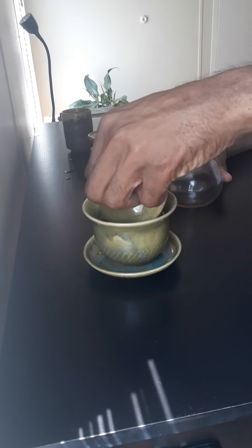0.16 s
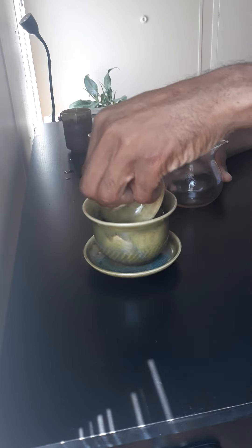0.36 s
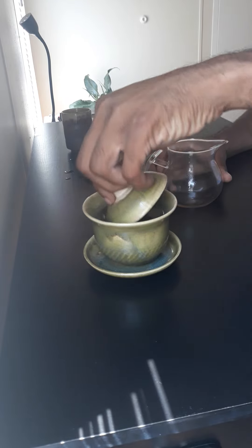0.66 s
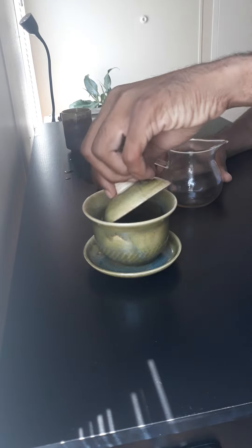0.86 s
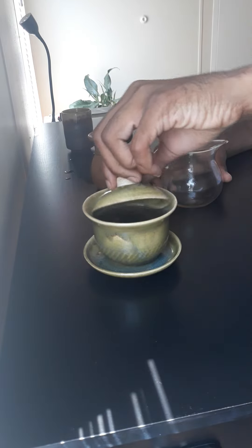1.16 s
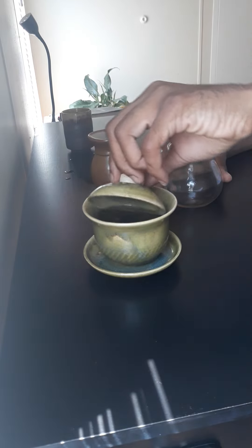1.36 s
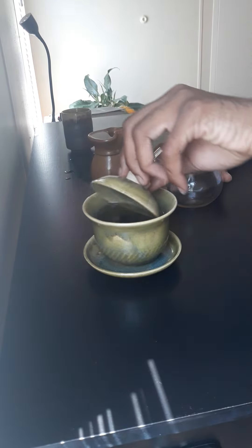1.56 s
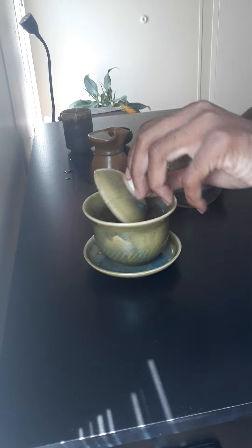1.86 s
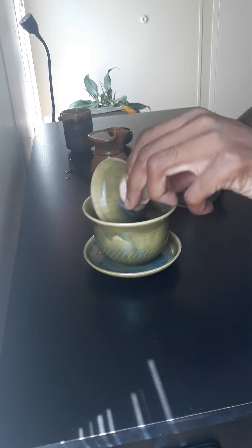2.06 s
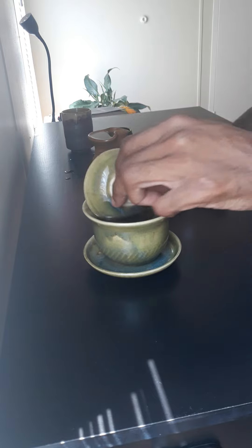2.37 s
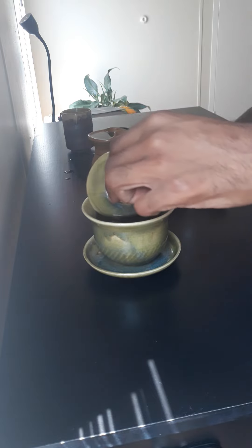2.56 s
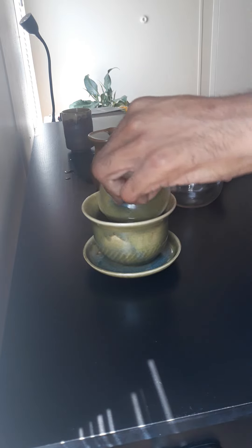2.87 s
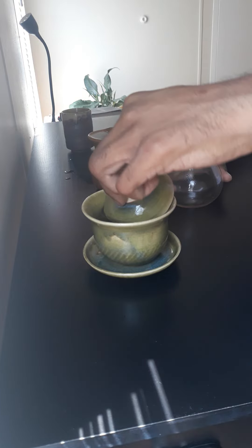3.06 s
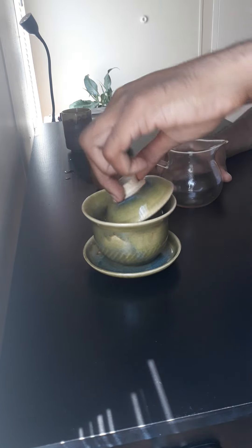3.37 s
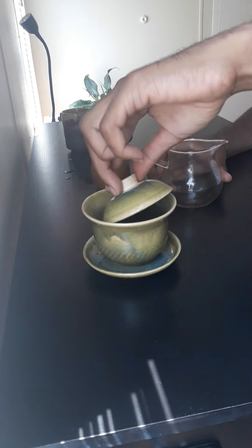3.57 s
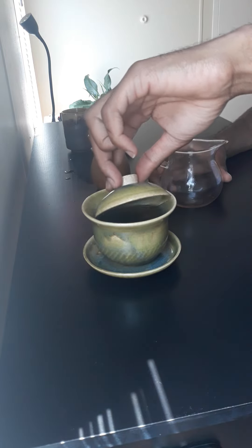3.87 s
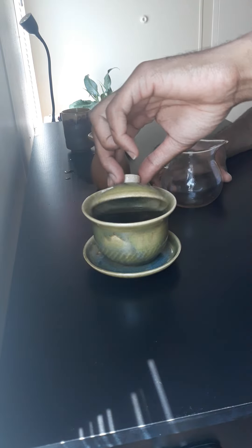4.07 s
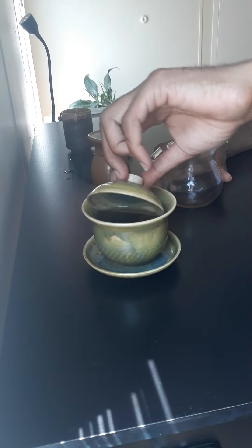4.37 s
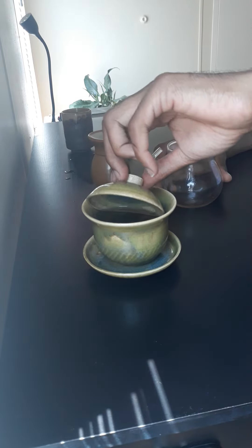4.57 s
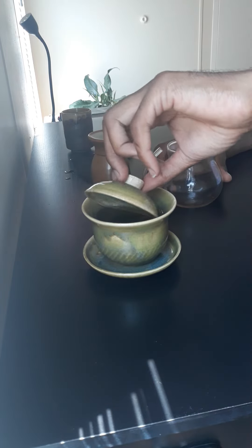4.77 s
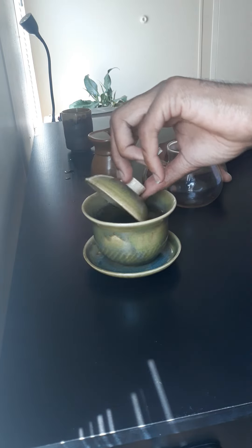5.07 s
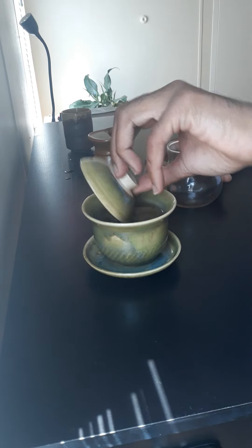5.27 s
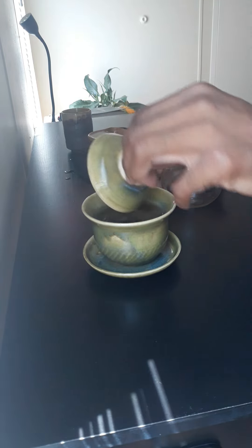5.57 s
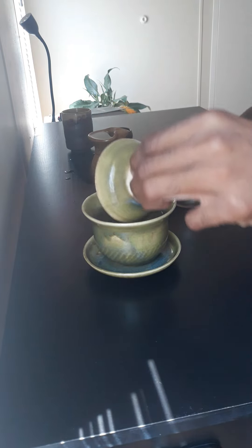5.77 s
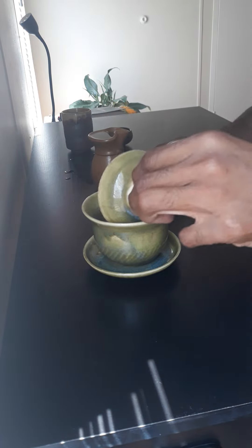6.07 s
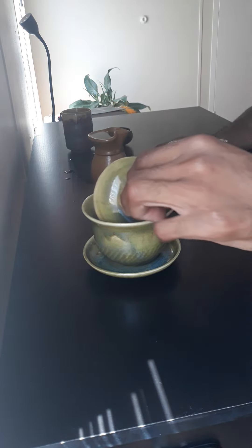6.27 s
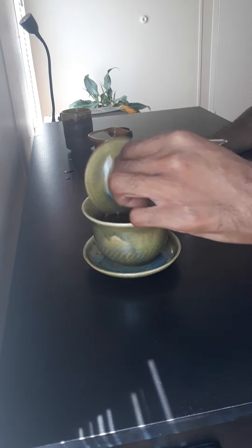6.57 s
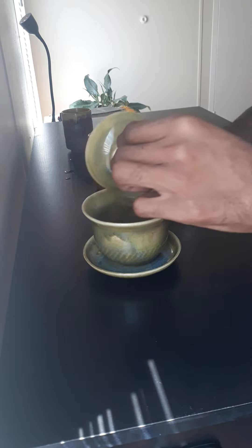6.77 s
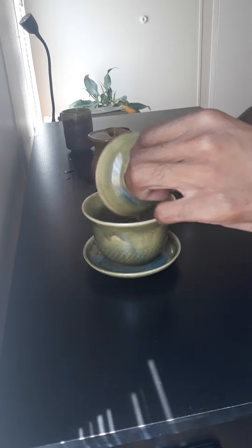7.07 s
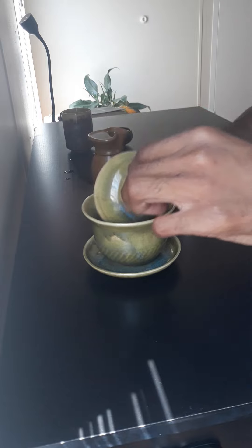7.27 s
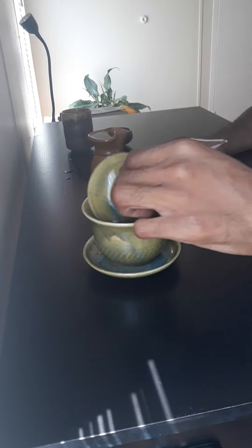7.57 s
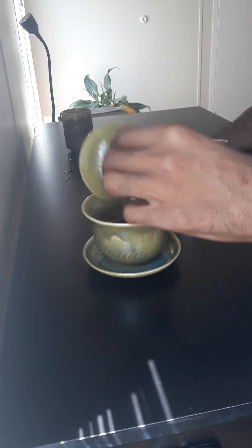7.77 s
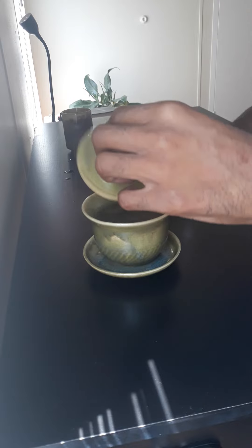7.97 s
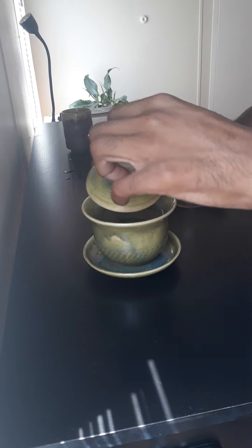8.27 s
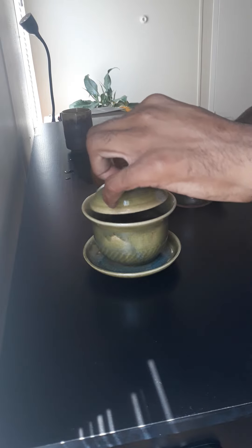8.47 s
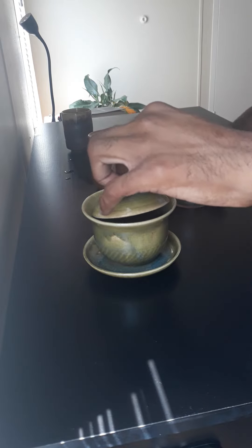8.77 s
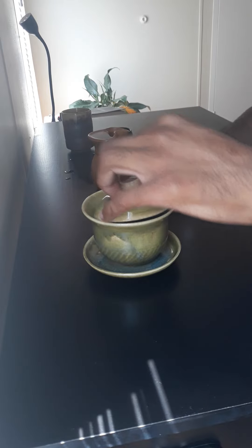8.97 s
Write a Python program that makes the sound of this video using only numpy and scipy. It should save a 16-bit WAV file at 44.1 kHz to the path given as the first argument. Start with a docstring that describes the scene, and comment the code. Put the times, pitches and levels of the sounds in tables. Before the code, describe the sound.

A ceramic lid knocks and scrapes around the inside of a tea bowl, then settles into occasional light clunks with short fading slides in a quiet room.

```python
"""A hand stirs tea in a ceramic bowl with its lid: for 5.4 s the lid knocks and drags on the wall.
Then the hand only holds the lid, which lands now and then with short fading slides; near 8.87 s come
a few small drops or bubbles. Struck and rubbed modes ring the ware at pitches that shift with each
hold on the lid; filtered noise gives thud and rumble of saucer and table, clack of the hollow and scrape.
A quiet room answers with decaying noise, under steady coloured noise and two wavering hum tones."""
import sys
import numpy as np
from scipy import signal
from scipy.fft import rfft, irfft, next_fast_len
from scipy.io import wavfile
from scipy.ndimage import uniform_filter1d, map_coordinates

SR = 44100
rng = np.random.default_rng(int(sys.argv[2]) if len(sys.argv) > 2 else 0)


def wav_record(signal):
    """Record a signal, one row per channel, as 16-bit PCM in the file named by sys.argv[1]."""
    frames = np.transpose(np.atleast_2d(signal))
    bounded = np.clip(frames, -1, 1)
    # unit amplitude maps onto the largest positive 16-bit level
    quanta = np.round(bounded * 32767).astype(np.int16)
    wavfile.write(sys.argv[1], SR, quanta)


N = 402622

# modes of the ware, one list each for the low, middle and high ring: [multiple of the ring's f,
# struck level/dB, dragged level/dB, t60/s, left-right level/dB, left lead/rad]
WARE_MODES = [
    [(1.0, -4.5, -10.5, 0.1, 12.5, 1.3), (1.02, 0.5, -2, 0.051, 1, 2.05),
     (.95, -6.5, -12.5, 0.041, 8.5, 1.3)],
    [(1.0, -1.5, -2.5, 0.14, 12.5, 1.5), (.99, 6.5, -2, 0.008, -1, 2.1), (1.87, -4, -7, 0.024, 6.5, 2),
     (2.77, -10, -15, .012, 13, 2.4)],
    [(1.0, 9.5, -5, 0.031, 6, 4.45), (1.75, -22.5, -23, 0.05, 7, .2)],
]
HIGH_MULTIPLE = 1.5  # modes above this multiple are struck as high rings
DETUNE_SHARE, FLUTTER_DB = 0.006, 2.5  # standard deviations at the knots of the random curves


def ware(force, hits, hold, rubbing_db):
    """Modal synthesis: hits and rubbing feed damped modes, which two ports hear out of step."""
    when, thud_db, _, _, *rings_db = hits
    rub = amp(rubbing_db) * unit(force + 1.26 * rng.standard_normal(N))  # the glaze adds an even hiss
    out = np.zeros((2, N))
    onset_pole = decay_pole(0.0051)  # a contact lasts a moment
    for modes, ring_hz, ring_db in zip(WARE_MODES, hold, rings_db):
        # the touching wall detunes the ring unevenly and mutes it by turns
        wavering_hz = ring_hz * (1 + DETUNE_SHARE * wobble(90))
        phase = 2 * np.pi * np.cumsum(wavering_hz) / SR
        flutter = amp(FLUTTER_DB * wobble(70))
        for multiple, hit_db, drag_db, t60, pan_db, lead in modes:
            struck_db = rings_db[-1] if multiple > HIGH_MULTIPLE else ring_db
            strike = blows(when, thud_db + hit_db + struck_db)
            # a ring sums the rubbing over its life
            rubbed = amp(drag_db) * np.sqrt(4 * np.log(1000) / (t60 * SR)) * rub
            # damping acts in a frame that turns with the moving pitch
            turn = np.exp(1j * multiple * phase)
            poles = np.poly([onset_pole, decay_pole(t60)])
            envelope = signal.lfilter([1 - onset_pole], poles, (strike + rubbed) * turn.conj())
            ring = flutter * turn * envelope
            out[0] += (amp(pan_db / 2) * np.exp(0.5j * lead) * ring).imag
            out[1] += (amp(-pan_db / 2) * np.exp(-0.5j * lead) * ring).imag
    return out


# each new hold on the lid shifts its rings and the hollow under it: [start t/s, low ring f/Hz,
# middle ring f/Hz, high ring f/Hz, clack against the thud level/dB, rubbed ring level/dB,
# struck high rings against the middle level/dB]
LID_HOLDS = [(0, 2381, 4520, 6230, -11.5, 0, -9), (0.257, 2415, 4283, 6230, -23.5, -2, -7),
             (0.479, 2496, 4246, 6340, -18.5, 1.5, -7), (1.0, 2567, 4292, 6350, -16, 1, -5),
             (1.45, 2520, 4232, 6330, -17.5, 2, 2.5), (1.8, 2547, 4172, 6290, -17, 2, -4.5),
             (2.15, 2495, 4172, 6310, -28, 2, -7.5), (2.45, 2514, 4307, 6200, -14.5, -7.5, -0.5),
             (3.09, 2530, 4325, 6320, -10.5, -1, -6.5), (3.32, 2543, 4350, 6340, -11.5, -7, -5),
             (3.75, 2586, 4252, 6260, -16, -0.5, -5), (4.4, 2450, 4290, 6200, -21, 1, -9),
             (4.86, 2505, 4214, 6250, -13.5, -3.5, -2.5), (5.6, 2360, 4550, 6230, -17.5, -4.5, -9),
             (6.11, 2358, 4185, 6040, -21, -0.5, 3), (6.3, 2385, 4030, 6150, -28, 2, -4),
             (7.2, 2350, 4150, 6110, -20.5, 3, -9.5), (8.4, 2395, 4560, 6400, -14.5, -14, 2.5),
             (8.8, 2530, 4620, 6200, -28, -7, -3)]


def holds():
    """Boundary conditions set the modes: each column is steady within a hold, with 20 ms shifts."""
    start, *columns = np.transpose(LID_HOLDS)
    which = np.searchsorted(start, np.arange(N) / SR, "right") - 1
    steps = np.array(columns)[:, np.maximum(which, 0)]
    return uniform_filter1d(steps, int(0.02 * SR), axis=1, mode="nearest")


# knocks of the lid, and near 8.87 s a few small drops or bubbles: [t/s, thud level/dB, thud f/Hz,
# then against the thud: low ring level/dB, upper rings level/dB]
KNOCKS_AND_DROPS = [(0.004, -28, 723, 0, -14), (0.101, -17, 923, -7.5, -14), (0.262, -18, 888, -14.5, -23),
                    (0.474, -32.5, 906, -31, -37), (0.556, -23.5, 910, -12.5, -32),
                    (0.611, -26.5, 865, -16, -27), (0.663, -27, 892, -11.5, -26),
                    (0.709, -18, 845, -19, -28), (0.77, -23.5, 648, -28, -27), (0.804, -27, 875, -22, -24),
                    (0.825, -28, 754, -18, -25), (0.957, -35.5, 725, -23, -12), (1.031, -23, 718, -16, -26),
                    (1.081, -30, 780, -29, -32), (1.151, -30, 786, -14.5, -23.5),
                    (1.259, -36, 780, -25, -11.5), (1.489, -27, 949, -47, -33),
                    (1.716, -25.5, 928, -22.5, -39), (1.801, -33, 1150, -31, -37),
                    (1.871, -27, 1137, -18.5, -40), (1.919, -27, 917, -28, -23),
                    (1.948, -29.5, 940, -33, -23), (2.021, -30, 1000, -19, -17.5),
                    (2.276, -28, 797, -22, -26.5), (2.329, -32.5, 742, -20, -18),
                    (2.471, -36.5, 940, -33, -19), (2.698, -36, 926, -29.5, -24),
                    (2.747, -24.5, 864, -28, -31), (2.85, -29.5, 925, -20, -45),
                    (2.896, -26, 690, -17, -44), (2.917, -22, 980, -11.5, -43),
                    (2.938, -32.5, 710, -22, -25), (3.035, -31.5, 590, -31, -32),
                    (3.103, -31, 800, -20, -30), (3.112, -18.5, 1010, -12.5, -22),
                    (3.213, -23, 728, -16.5, -27), (3.239, -36, 695, -16, -20), (3.327, -28, 783, -17, -32),
                    (3.337, -24, 966, -11, -19), (3.351, -18, 920, -1.5, -16),
                    (3.359, -23, 684, -2.5, -9.5), (3.386, -26, 685, -9, -16.5),
                    (3.488, -31.5, 746, -11.5, -24), (3.624, -25.5, 752, -16.5, -31),
                    (3.691, -27, 810, -10, -30), (3.709, -28.5, 707, -11, -23),
                    (3.828, -34, 755, -10.5, -19.5), (3.935, -27.5, 676, -23, -23),
                    (4.015, -22, 450, -23, -26), (4.075, -24, 445, -20, -26), (4.095, -25, 425, -21, -25),
                    (4.128, -23, 434, -12, -23.5), (4.235, -21.5, 894, -24, -26),
                    (4.624, -38.5, 770, -39, -26), (4.756, -30.5, 785, -29, -27.5),
                    (4.829, -22, 676, -22, -35), (4.871, -27.5, 716, -19, -33),
                    (4.903, -19.5, 890, -9.5, -18), (5.108, -34, 710, -19.5, -24),
                    (5.213, -36, 665, -23, -30), (5.868, -29, 678, -10, -21), (6.133, -23, 567, -3, -13.5),
                    (6.232, -30, 675, -17, -27), (6.249, -28, 688, -19, -26), (6.325, -45, 1085, -10, -27),
                    (6.411, -29, 690, -21.5, -35), (7.331, -23, 670, -6, -8.5),
                    (7.411, -32.5, 775, -11, -41), (7.575, -38, 693, -14.5, -28),
                    (8.619, -19, 874, -12, -40), (8.712, -29.5, 954, -28, -28.5),
                    (8.855, -40, 778, -24, -34), (8.869, -38, 1250, -22, -44), (8.886, -46, 795, -32, -40),
                    (8.956, -48, 1166, -36, -40), (8.978, -42.5, 860, -36, -36),
                    (8.998, -45.5, 950, -40, -39)]
# small random catches of the dragged lid, spread evenly over the whole time
TICKS, TICK_HZ = 200, 807  # number, mean pitch
TICK_OVER_SCRAPE_DB, TICK_SPREAD_DB = 8.5, 3  # thud of the weakest catches; dB per e-fold of rarity
TICK_LOW_DB, TICK_UPPER_DB = -24, -30.5  # mean ring levels against the thud


def small_events(scrape_db, hold):
    """Impulsive excitation by knocks, drops and catches: t/s, thud/dB, f/Hz, clack and three rings/dB."""
    when, size, pitch, low, upper = rng.random((TICKS, 5)).T
    s = when * (N - 1) / SR
    local_db = scrape_db[(s * SR).astype(int)]
    thud_db = local_db + TICK_OVER_SCRAPE_DB - TICK_SPREAD_DB * np.log(size + 0.0091)
    hz = TICK_HZ * (0.75 + 0.5 * pitch)
    ticks = [s, thud_db, hz, TICK_LOW_DB + 10 * (low - 0.5), TICK_UPPER_DB + 10 * (upper - 0.5)]
    s, thud_db, hz, low_db, upper_db = np.hstack([np.transpose(KNOCKS_AND_DROPS), ticks])
    at = (s * SR).astype(int)
    _, _, _, clack_db, _, high_db = hold
    return s, thud_db, hz, clack_db[at], low_db, upper_db, upper_db + high_db[at]


def thuds(hits):
    """Impulse response: a decaying hollow note, a table rattle, a clack and a crack for each hit."""
    when, thud_db, pitch, clack_db, _, _, high_db = hits
    note = np.zeros(N + SR)
    t = np.arange(SR // 8) / SR
    for s, db, hz in zip(when, thud_db, pitch):
        envelope = amp(db - 5.5 - 60 * t / 0.055) * (1 - np.exp(-t / 0.0011))
        note[int(s * SR):][:len(t)] += envelope * np.sin(2 * np.pi * hz * t)
    rattle_force = build_up(fading(blows(when, thud_db + 6.5), 0.079)) * rng.standard_normal(N)
    rattle = filtered(rattle_force, table)
    clack_force = build_up(fading(blows(when, thud_db + clack_db + 16.5), 0.029)) * rng.standard_normal(N)
    clack = filtered(clack_force, hollow)
    short_burst = fading(blows(when, thud_db + high_db + 5.5), 0.03)
    long_burst = fading(blows(when, thud_db + high_db - 14), 0.22)
    crack = filtered((short_burst + long_burst) * rng.standard_normal(N), contact_noise)
    return note[:N] + rattle + clack + crack


def build_up(x):
    """First-order lag: a hit approaches its full force by 60 dB in 4.1 ms."""
    return fading(x, 0.0041) * (1 - decay_pole(0.0041))


# resonances of the hollow of the bowl under the lid: [f/Hz, width f/Hz, level/dB]
HOLLOW_MODES = [(1174, 730, -3.5), (1582, 657, -0.5), (2870, 2700, -17.5)]


def hollow(hz):
    """Cavity resonance: broad, twice-filtered bands of the air between lid and bowl."""
    return sum((-1) ** k * amp(db) * resonance(hz, centre, width) ** 2
               for k, (centre, width, db) in enumerate(HOLLOW_MODES))


# resonances of saucer and table top: [f/Hz, width f/Hz, level/dB]
TABLE_MODES = [(168.3, 20, -5), (241.3, 35.8, -1), (321, 55, -3.5), (425, 69, -2), (563, 38.4, 0.5),
               (653, 59.5, 2.5), (742, 74.7, 4.5), (947, 118, -2), (1152, 115, -7.5), (1380, 150, -38.5),
               (1753, 44, -25)]


def table(hz):
    """Modal superposition: resonances of saucer and table top added with alternating sign."""
    return sum((-1) ** k * amp(db) * resonance(hz, centre, width)
               for k, (centre, width, db) in enumerate(TABLE_MODES))


# spectrum of the contact noise: [f/Hz, level/dB]
CONTACT_SPECTRUM = [(1800, -32), (2500, -6), (3500, -11.5), (7500, 3), (8400, -50), (10400, -41),
                    (11500, -8), (16000, -27.5)]


def contact_noise(hz):
    """Spectral shaping: the gain of the contact noise at each frequency."""
    return amp(along(CONTACT_SPECTRUM, hz))


def drag(force, rumble_db, scrape_db, ring_db):
    """Stick-slip friction: the lid slips along the wall; the heavy push rumbles in the table."""
    push = grit(rate=60, spread_db=2, smooth=1.9)
    rumble = unit(filtered(push, lambda hz: table(hz) / (1 + (hz / 480) ** 6)))  # low-pass
    # table and hollow together, high-passed
    grind = unit(filtered(force, lambda hz: (table(hz) + amp(-25.5) * hollow(hz)) / (1 + (520 / (hz + 1)) ** 6)))
    hiss = unit(filtered(force, contact_noise))
    return amp(rumble_db - 1.6) * rumble + amp(scrape_db - 4.0) * grind + amp(ring_db - 11.5) * hiss


def grit(rate, spread_db, smooth):
    """Shot noise: contact force of rms 1 from uneven slips, rate a second, over a smooth share."""
    sizes = amp(spread_db * np.minimum(rng.exponential(size=N), 3))
    slips = (rng.random(N) < rate / SR) * sizes
    return unit((unit(fading(slips, 0.013)) + smooth) * rng.standard_normal(N))


def rub_db(scrape_db, hold):
    """Friction drive: the rubbing of the rings follows the scrape and the hold."""
    return scrape_db - 15.5 + hold[4]


# the lid dragged round while stirring: [t/s, rumble of the push level/dB, scrape level/dB]
STIRRING = [(0, -42.5, -50), (.4, -46.5, -53), (.65, -36.5, -46), (1.0, -44, -51.5), (1.22, -43, -46),
            (1.6, -47, -50.5), (1.9, -41.5, -43.5), (2.15, -49, -49.5), (2.5, -62, -54.5), (2.95, -53, -46),
            (3.3, -46.5, -51), (3.55, -42.5, -41.5), (3.9, -47.5, -54), (4.13, -38, -42.5),
            (4.3, -47.5, -59.5), (4.45, -60.5, -77), (4.7, -54, -63), (4.93, -44, -52),
            (5.15, -56.5, -55.5), (5.4, -60.5, -73)]
# short slides of the lid after it lands: [start t/s, length t/s, rumble level/dB, scrape level/dB]
LANDING_SLIDES = [(5.87, 0.094, -59, -62), (6.135, 0.32, -49, -52.5), (7.34, 0.24, -48, -52.5),
                  (8.617, .12, -43.5, -50.5), (8.845, 0.15, -62, -64)]
SLIDE_RISE_S, SLIDE_FALL_S, SLIDE_FADE_DB_PER_S = 0.019, 0.083, 19.5
REST_RUMBLE_DB, REST_SCRAPE_DB = -60, -80  # while the hand only holds the lid


def dragging():
    """Power addition, rumble and scrape in dB: stirring, then rest with short fading slides."""
    t = np.arange(N) / SR
    rest_db = np.array([[REST_RUMBLE_DB], [REST_SCRAPE_DB]])
    power = amp(np.where(t < STIRRING[-1][0], curves(STIRRING), rest_db)) ** 2
    for s, length, *db in LANDING_SLIDES:
        shape = np.interp(t - s, [0, SLIDE_RISE_S, length, length + SLIDE_FALL_S], [0, 1, 1, 0])
        fade_db = SLIDE_FADE_DB_PER_S * np.clip(t - s, 0, 1)
        power += (shape * amp(np.c_[db] - fade_db)) ** 2
    return 10 * np.log10(power)


# decay of the room: [f/Hz, t60/s]
ROOM_DECAY = [(200, 0.24), (1000, 0.26), (4000, 0.53), (12000, 0.16)]


def room(x):
    """Reverberation as decaying noise: each frequency of the answer dies at its own speed."""
    hz, t, z = signal.stft(rng.standard_normal((2, SR // 2)), SR, nperseg=256)
    decay = amp(-60 * t / along(ROOM_DECAY, hz)[:, None])
    tail = signal.istft(z * decay, SR, nperseg=256)[1]
    tail = tail / np.linalg.norm(tail, axis=1, keepdims=True)
    return signal.fftconvolve(x[None], tail, axes=1)[:, :N]


# relative spectrum of room and microphone noise: [f/Hz, level per Hz/dB]
HUSH_SPECTRUM = [(25, -46), (40, -8.5), (60, -5), (125, -5), (220, 2), (330, -9), (500, -31), (800, -17),
                 (1050, -40.5), (1400, -39.5), (2000, -34.5), (6800, -38.5), (7800, -47.5), (16000, -42)]
# likeness of left and right: [f/Hz, correlation]
PORT_LIKENESS = [(30, .99), (60, 0.79), (180, 1), (550, 0.59), (1650, -0.067), (4970, -0.2), (15000, 0.086)]
# appliances: [f/Hz, mean rms level/dB]
HUM_TONES = [(85, -62), (120, -65.5)]


def hush():
    """Partly coherent noise: steady, alike at both ports in the bass, with a wavering hum."""
    def mid_side_gains(hz):
        turn = np.arccos(np.clip(along(PORT_LIKENESS, hz), -1, 1)) / 2
        return amp(along(HUSH_SPECTRUM, hz)) * [np.cos(turn), np.sin(turn)]

    mid, side = filtered(rng.standard_normal((2, N)), mid_side_gains)
    noise = amp(-51.5) * unit(np.array([mid + side, mid - side])) * amp([[0.3], [-0.3]])
    t = np.arange(N) / SR
    hum = np.zeros(N)
    for hz, db in HUM_TONES:
        level = np.sqrt(2) * amp(db + 2.9 * wobble(2.99))
        hum += level * np.sin(2 * np.pi * hz * t + 0.33 * wobble(2.18))
    return noise + hum


def amp(db):
    """Level law: 20 dB is a factor of ten in amplitude."""
    return 10 ** (np.asarray(db) / 20)


def unit(x):
    """Normalisation to an rms of 1."""
    return x / np.sqrt(np.mean(x ** 2) + 1e-20)


def along(points, hz):
    """Interpolation of (f/Hz, value) points on a log axis."""
    f, v = np.transpose(points)
    return np.interp(np.log(hz + 1), np.log(f + 1), v)


def curves(rows):
    """Linear interpolation in time: one value per sample for each column after the time."""
    s, *columns = np.transpose(rows)
    return [np.interp(np.arange(N) / SR, s, c) for c in columns]


def wobble(rate):
    """Band-limited fluctuation: a smooth random curve through rate knots a second."""
    knots = rng.standard_normal(int(N * rate / SR) + 4)
    return map_coordinates(knots, [np.arange(N) * rate / SR])


def filtered(x, response):
    """Convolution theorem: the spectrum of x times a response of frequency."""
    m = next_fast_len(N + SR // 2)
    return irfft(rfft(x, m) * response(np.fft.rfftfreq(m, 1 / SR)), m)[..., :N]


def resonance(hz, centre, width):
    """Damped oscillator: band-pass response with gain 1 at its centre."""
    return 1j * hz * width / (centre * centre - hz * hz + 1j * hz * width)


def blows(s, db):
    """Impulsive excitation: one impulse for each hit."""
    return np.bincount((s * SR).astype(int), amp(db), N)


def decay_pole(t60):
    """Exponential decay: the factor per sample that loses 60 dB in t60 seconds."""
    return amp(-60 / (t60 * SR))


def fading(x, t60):
    """Exponential decay: every impulse dies away by 60 dB in t60 seconds."""
    return signal.lfilter([1], [1, -decay_pole(t60)], x)


def scene():
    """Superposition: rings, body sounds at two ports, their reverberation and the room noise."""
    force = grit(rate=130, spread_db=2.0, smooth=0.73)
    hold = holds()
    rumble_db, scrape_db = dragging()
    hits = small_events(scrape_db, hold)
    ring_db = rub_db(scrape_db, hold)
    rings = ware(force, hits, hold, ring_db)
    body = thuds(hits) + drag(force, rumble_db, scrape_db, ring_db)
    # the left port lags a little
    ports = filtered(body, lambda hz: np.exp(1j * hz / 3500 * np.array([[-1], [1]])))
    direct = rings + ports * amp([[0.6], [-0.6]])
    return direct + amp(-4) * room(body) + amp(-11) * room(rings[0]) + hush()


def record(dry):
    """Band limitation: nothing is kept from 15.8 kHz up."""
    return filtered(dry, lambda hz: hz < 15800)


dry = scene()
out = record(dry)
wav_record(out)
```